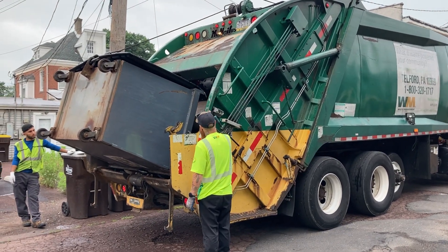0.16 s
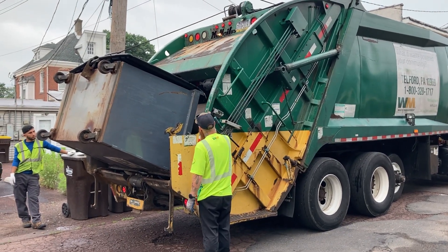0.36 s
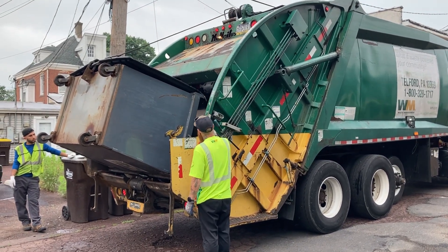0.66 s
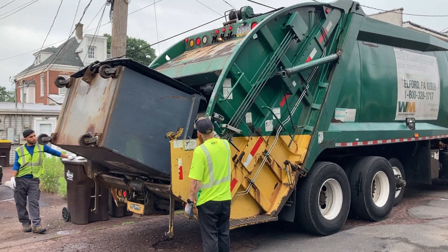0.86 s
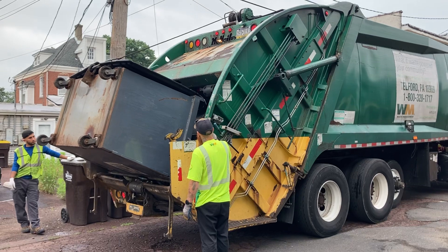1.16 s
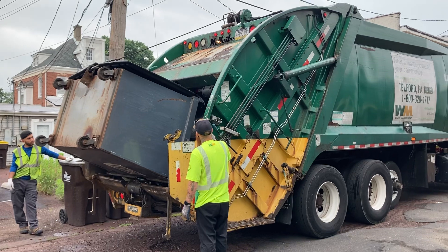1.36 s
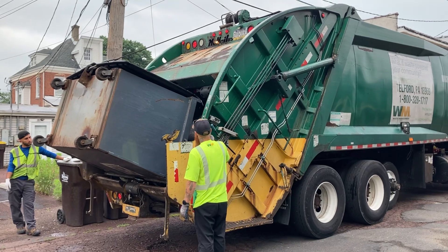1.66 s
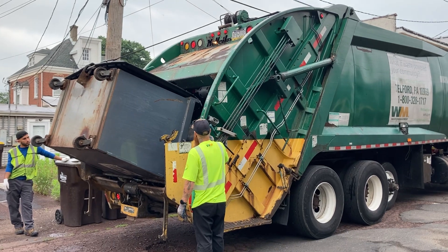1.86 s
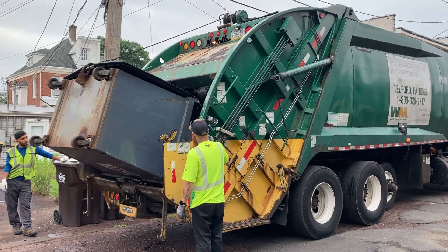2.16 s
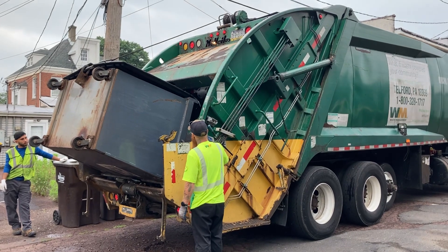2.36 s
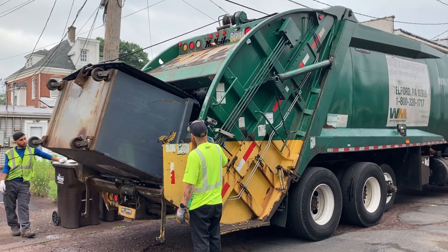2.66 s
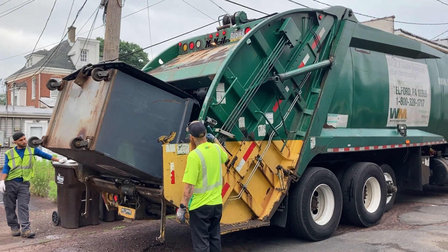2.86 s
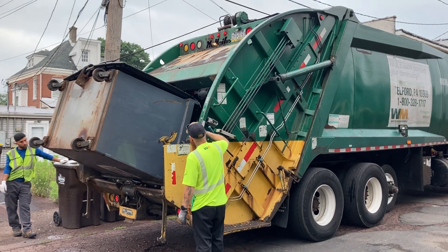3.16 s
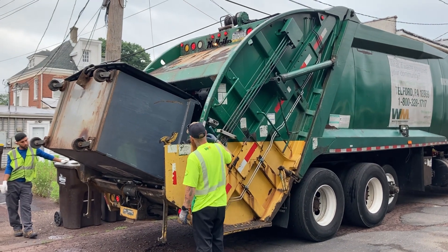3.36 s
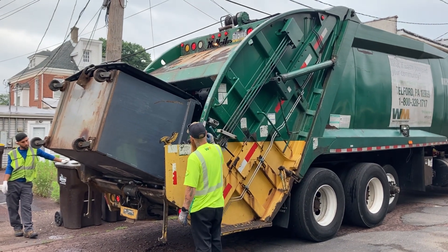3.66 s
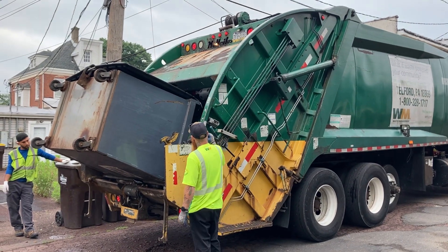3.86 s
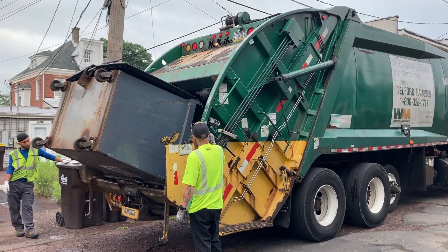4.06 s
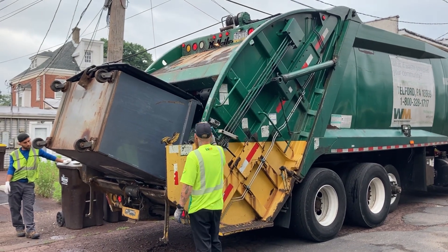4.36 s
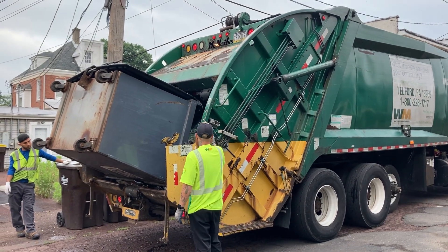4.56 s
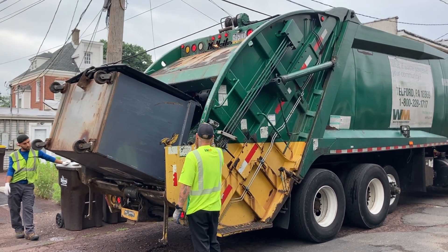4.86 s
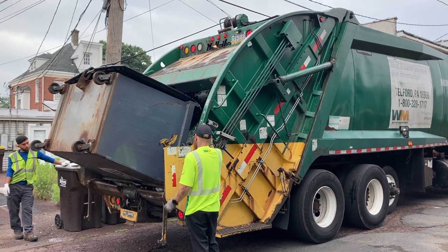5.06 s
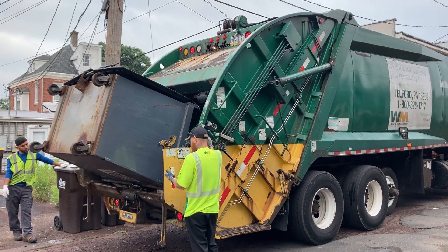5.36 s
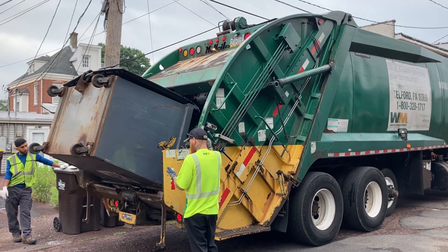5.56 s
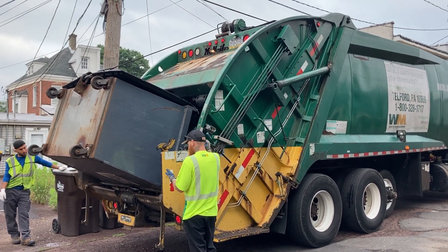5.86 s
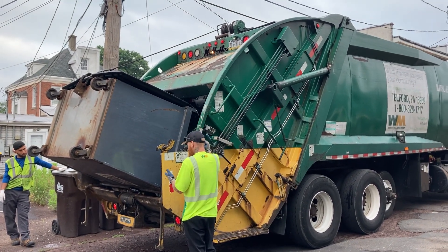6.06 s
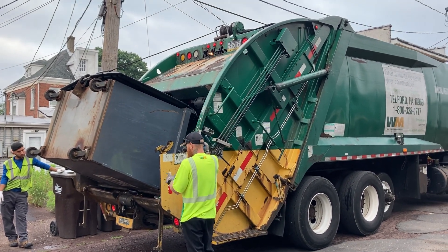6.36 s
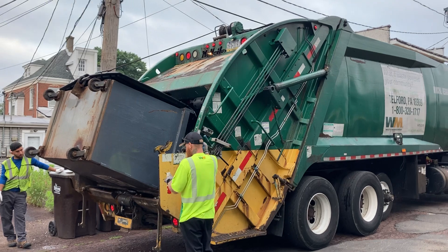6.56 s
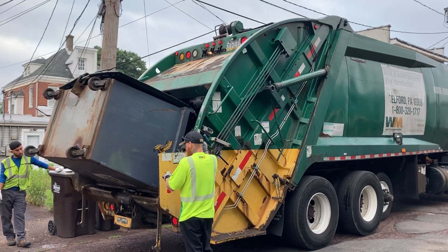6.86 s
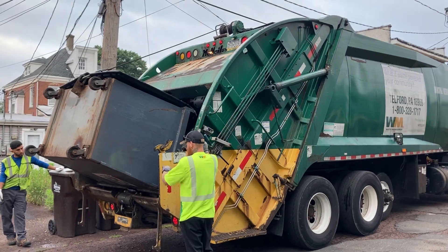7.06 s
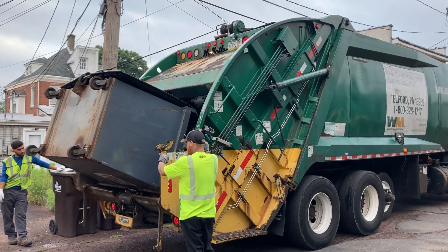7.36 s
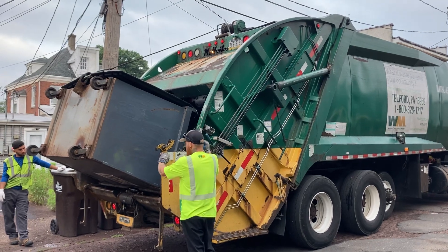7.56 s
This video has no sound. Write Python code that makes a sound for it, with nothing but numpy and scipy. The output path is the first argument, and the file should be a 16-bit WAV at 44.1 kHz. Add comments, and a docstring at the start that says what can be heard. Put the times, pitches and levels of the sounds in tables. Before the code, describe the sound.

From 0 s a heavy diesel refuse truck idles fast and close by, filling the stereo picture with a drone near 100 Hz, broad low roar, ringing body panels, valve clatter, light hiss and fine high jingling of loose steel. Hydraulic pump hum throbs nearly four times a second until about 1.8 s. At about 2 s the revs rise slightly, the drone surges unevenly and the rattle thickens; speed eases back from 2.7 to 4 s. The load knocks at 2.46 and 2.6 s, with faint taps near 3 s, a short airy puff at 3.08 s, and a dense hollow metallic tumble from 3.25 to 3.45 s. The steady idle continues, its drone slowly swelling and dipping, with weak taps at 3.75, 5, 5.15, 6.1 and 6.36 s. A tight cluster of bright dry cracks hits at 7.2 s, with a tiny one at 7.6 s. Short street reflections follow the impacts; the engine never stops.

```python
"""In a street, a diesel refuse truck idles fast while its hydraulic lift holds a steel bin tipped; the revs flare once.
Sine tones make the exhaust drone and pump hum; shaped noise makes the roar, body rattle, valve clatter and hiss.
Each firing taps loose steel parts into ringing modes. The load knocks and snaps in noise bursts with modes,
and a valve puffs shaped noise. Left and right differ in phase, likeness and level by frequency; an echo follows."""
import sys
import numpy as np
from scipy import signal
from scipy.fft import rfft, irfft, next_fast_len
from scipy.io import wavfile
from scipy.ndimage import uniform_filter1d, map_coordinates

SR = 44100
rng = np.random.default_rng(int(sys.argv[2]) if len(sys.argv) > 2 else 0)


def to_wav(s):
    """Save 16-bit WAV."""
    ch = np.atleast_2d(s).T  # columns
    pcm = np.round(np.clip(ch, -1, 1) * 32767)  # PCM
    wavfile.write(sys.argv[1], SR, pcm.astype(np.int16))


N = 339570
T = np.arange(N) / SR


def amp(db):
    """Gain of a level in dB."""
    return 10 ** (np.asarray(db) / 20)


def unit(x):
    """x at rms 1."""
    return x / np.sqrt(np.mean(x ** 2) + 1e-20)


def curves(rows, at):
    """Every column after the first, interpolated at the given values of the first."""
    first, *columns = np.transpose(rows)
    return [np.interp(at, first, column) for column in columns]


def wobble(rate):
    """A smooth random curve with rate knots a second."""
    coarse = T[::64]
    knots = rng.standard_normal(int(N * rate / SR) + 4)
    return np.interp(T, coarse, map_coordinates(knots, [coarse * rate]))


def phase(hz):
    """Angle in radians of a tone whose pitch follows hz."""
    return 2 * np.pi * np.cumsum(hz) / SR


def filtered(x, response):
    """x times a response of frequency."""
    padded = next_fast_len(x.shape[-1] + 8192)
    spectrum = rfft(x, padded) * response(np.fft.rfftfreq(padded, 1 / SR))
    return irfft(spectrum, padded)[..., :x.shape[-1]]


def noise(spectrum, size=N):
    """Noise of rms 1 with a (freq_hz, level_db) spectrum on a log axis; size may hold several rows."""
    freq_hz, level_db = np.transpose(spectrum)

    def shape(hz):
        return amp(np.interp(np.log(hz + 1), np.log(freq_hz), level_db, left=-120))
    return unit(filtered(rng.standard_normal(size), shape))


def add(out, start_s, sound):
    """Mixes a sound in at start_s seconds."""
    start = round(start_s * SR)
    out[start:start + len(sound)] += sound[:len(out) - start]


def scattered(x):
    """The street's echo: each 30 Hz band comes back after its own delay, about 3 to 19 ms."""
    knots = np.arange(800)
    phase_lag = np.cumsum(rng.uniform(0.498, 3.5, len(knots)))  # radians; its slope is the delay
    return filtered(x, lambda hz: np.exp(-1j * np.interp(hz, 30 * knots, phase_lag)))


PUFF_S, PUFF_DB, PUFF_LENGTH_S = 3.075, -46, 0.025  # middle; narrow swell's peak; middle to 6 dB down
PUFF_SKIRT_DB, PUFF_SKIRT_S = 2, .08  # longer leak: peak over the narrow swell; middle to 6 dB down


def air_valve():
    """Air hissing through a narrow outlet: band noise that swells and fades."""
    outlet = noise([(4800, -29), (5700, -5), (6250, 0), (6700, -7), (7400, -24), (16000, -60)])

    def bell(length_s):
        return 2 ** -((T - PUFF_S) / length_s) ** 2
    swell = bell(PUFF_LENGTH_S) + amp(PUFF_SKIRT_DB) * bell(PUFF_SKIRT_S)
    return amp(PUFF_DB) * swell * outlet


# dry cracks in the load: start_s [s], drive_db [dB], noise_t60_s [s]
SNAP_EVENTS = [(7.2012, -20, .035), (7.2061, -18, .01), (7.2071, -15, .01), (7.2105, -28, .12),
               (7.2175, -32, .06), (7.2245, -32, .12), (7.585, -35, .04)]
# colour of the crack noise: freq_hz [Hz], level_db [dB per Hz, relative]
SNAP_SPECTRUM = [(1500, -16), (2800, 0), (3700, -4), (4800, 0), (5600, -8), (8000, -8), (10000, -12),
                 (15000, -16)]
# short modes a snap rings: freq_hz [Hz], level_db [dB against the drive]
SNAP_MODES = [(2720, -3), (3100, -10), (3350, -6), (3840, -13), (4420, -8), (4620, -6), (5100, -7)]
SNAP_RISE_S, SNAP_CRACK_DB, SNAP_RING_S = .0003, -2, .018  # rise time; noise share; t60 of the modes


def snaps():
    """Dry bright cracks: decaying noise over a few short modes."""
    out, t = np.zeros(N), T[:SR // 5]
    for start_s, drive_db, noise_t60_s in SNAP_EVENTS:
        crack = amp(SNAP_CRACK_DB - 60 * t / noise_t60_s) * noise(SNAP_SPECTRUM, size=len(t))
        modes = sum(amp(level_db + rng.normal(0, 1.1)) * np.sin(2 * np.pi * freq_hz * t)
                    for freq_hz, level_db in SNAP_MODES)
        ring = amp(-60 * t / SNAP_RING_S) * modes
        rise = 1 - np.exp(-t / SNAP_RISE_S)
        add(out, start_s, amp(drive_db) * rise * (crack + ring))
    return out


# load knocking on the bin: start_s [s], drive_db [dB], burst_t60_s [s], tilt_db [dB per octave],
# ring_db [dB, gain of the bin's modes]
KNOCK_EVENTS = [(2.4565, -24, .04, 1, -20), (2.596, -30, .03, 3, -25), (2.954, -34, .03, 2, -25),
                (3.092, -35, .04, 1, -20), (3.135, -34, .04, 0, -15), (3.25, -27, .05, 2, -8),
                (3.259, -27, .05, 2, -4), (3.268, -25, .04, 1, 6), (3.2747, -24, .04, 0, 4),
                (3.281, -23, .04, -1, 11), (3.291, -25, .05, -2, 5), (3.3, -25, .05, -1, 5),
                (3.311, -27, .05, -1, 4), (3.326, -31, .06, 0, 1), (3.345, -30, .07, 0, 2),
                (3.362, -32, .08, 1, -5), (3.396, -33, .06, 0, -5), (3.455, -36, .04, -2, 2),
                (3.745, -34, .04, 1, -20), (4.96, -34, .04, 1, -20), (5.153, -33, .04, 0, -15),
                (6.105, -34, .05, 1, -15), (6.135, -32, .08, -1, -10), (6.36, -33, .04, -1, -15)]
# modes of the steel bin: freq_hz [Hz], level_db [dB, relative], t60_s [s]
BIN_MODES = [(42, -10, .3), (214, -3, .08), (310, -1, .07), (350, 1, .07), (420, -2, .08), (530, -3, .1),
             (645, -8, .08), (965, -9, .09), (1215, -13, .06), (1450, -14, .06), (2360, -18, .11),
             (2794, -13, .13), (3262, -17, .12), (3461, -18, .11), (4185, -17, .11), (4510, -17, .1),
             (8010, -15, .15)]
KNOCK_RISE_S = 0.0019
BIN_SCATTER_HZ = 11  # pitch scatter of a mode from blow to blow


def knocks():
    """Blows of the load: a burst of tilted noise and the bin's decaying modes."""
    out, t = np.zeros(N), T[:SR // 3]
    for start_s, drive_db, burst_t60_s, tilt_db, ring_db in KNOCK_EVENTS:
        # the tilt pivots at 2260 Hz; the top loses a further 10 dB by 16 kHz
        spectrum = [(200, -3.5 * tilt_db), (2260, 0), (16000, 2.8 * tilt_db - 10)]
        burst = noise(spectrum, size=len(t)) * amp(-60 * t / burst_t60_s)
        ring = np.zeros(len(t))
        for freq_hz, level_db, t60_s in BIN_MODES:
            decay = amp(level_db + rng.normal(0, 3) - 60 * t / t60_s)
            ring += decay * np.sin(2 * np.pi * rng.normal(freq_hz, BIN_SCATTER_HZ) * t)
        rise = 1 - np.exp(-t / KNOCK_RISE_S)
        add(out, start_s, amp(drive_db) * rise * (burst + amp(ring_db) * ring))
    return out


# fuzzy tone that drops while the revs flare: time_s [s], pitch_hz [Hz], level_db [dB]
WHINE = [(0, 1055, -42), (1.9, 1055, -44), (2.1, 985, -40), (2.7, 980, -44), (3.2, 1000, -44),
         (3.6, 1050, -46), (7.7, 1050, -48)]
WHINE_WIDTH_HZ = 45  # rate of the noise that blurs the tone


def whine():
    """Slow noise carried on a moving pitch."""
    pitch_hz, level_db = curves(WHINE, T)
    angle = phase(pitch_hz)
    fuzzy = wobble(WHINE_WIDTH_HZ) * np.cos(angle) + wobble(WHINE_WIDTH_HZ) * np.sin(angle)
    return amp(level_db) * unit(fuzzy)


# engine speed: time_s [s], firing_rate [firings per second]
SPEED = [(0, 32.52), (1.94, 32.6), (2.06, 34), (2.13, 34.5), (2.22, 34.1), (2.73, 33.6), (3.02, 33.3),
         (3.34, 32.9), (4.05, 32.5), (7.7, 32.52)]


def firings():
    """Firings counted since the start: the running sum of the engine speed."""
    return np.cumsum(curves(SPEED, T)[0]) / SR


# force on the loose parts: time_s [s], then drive_db [dB] of the first, second and third part
JINGLE_DRIVE = [(0, -36, -42, -42), (0.35, -32, -41, -39), (1.35, -35, -48, -40), (2.1, -32, -44, -36),
                (2.24, -54, -61, -52), (2.8, -41, -55, -53), (3.3, -37, -39, -47), (3.7, -41.5, -74, -43),
                (4.55, -36.5, -45.5, -40), (5.25, -36.5, -47, -43), (5.9, -44, -51, -48),
                (6.3, -43, -46, -45), (6.45, -38, -32.5, -45), (6.6, -49, -43, -46),
                (6.78, -30.5, -36.5, -43), (7.05, -40, -46, -40), (7.25, -39, -37, -43),
                (7.7, -44, -40.5, -46)]
# modes of the loose parts, one list for each: freq_hz [Hz], level_db [dB against the drive], t60_s [s]
JINGLE_PARTS = [
    [(7050, -2, .015), (7280, 4, .045), (7430, -6, .04), (8210, -3, .12), (10655, -8, .08),
     (11305, -10, .07)],
    [(10958, 2, .08), (12805, 1, .09), (15280, -10, .12)],
    [(8940, 1, .09), (13390, -2, .1)],
]


def jingle():
    """Each firing shakes the loose parts; every tap rings each mode at a new strength and phase."""
    taps = np.flatnonzero(np.diff(np.floor(firings() - .41)))
    taps = np.clip(taps + rng.normal(0, 0.00091 * SR, len(taps)), 0, N - 1).astype(int)
    force_db = 2 * rng.standard_normal(len(taps))
    out = np.zeros(N)
    for modes, drive_db in zip(JINGLE_PARTS, curves(JINGLE_DRIVE, taps / SR)):
        for freq_hz, level_db, t60_s in modes:
            slow_db = uniform_filter1d(rng.normal(0, 5.5, len(taps)), size=3)
            chance_db = slow_db + rng.normal(0, 3, len(taps))
            strength = amp(drive_db + level_db + force_db + chance_db)
            blows = np.zeros(N, np.complex64)
            blows[taps] = strength * np.exp(2j * np.pi * rng.random(len(taps)))
            turn = np.exp(2j * np.pi * freq_hz / SR)
            ring = turn * amp(-60 / (t60_s * SR))
            rise = turn * np.exp(-1 / (0.0034 * SR))
            # two decays subtracted: the ring swells, then dies
            out += signal.lfilter([ring - rise], np.poly([ring, rise]), blows).real
    return out


def shaft_tone(multiple, level_db):
    """A sine at a multiple of the firing rate, of rms level_db; its wandering phase makes it a little fuzzy."""
    drift = .5 * wobble(5) + rng.uniform(0, 2 * np.pi)
    return np.sqrt(2) * amp(level_db) * np.sin(2 * np.pi * multiple * firings() + drift)


# weaker tones: multiple [of the firing rate], before_db, during_db, after_db [dB, around the flare],
# waver_db [dB]
TONES = [(1, -46, -47, -55, 3), (1.501, -51, -50, -61, 3.7), (2, -34, -33.5, -30, 1.2),
         (3.82, -31.5, -37, -33, 2.1), (4, -37.5, -35.5, -35, 2.7), (5, -40, -40, -42, 3.4),
         (6, -28, -27, -34, 1.7), (6.3, -31, -40, -34.5, 2.5), (7, -48, -37, -32, 2.1),
         (8, -44, -33.5, -52, 2), (9, -45, -37, -41.5, 2.2)]
# the flare sets in, is full, starts to pass, is over [s]
FLARE_S = 1.95, 2.15, 3.2, 3.6


def weaker_tones():
    """Sines locked to the shaft that waver and change level with the flare of the revs."""
    out = np.zeros(N)
    for multiple, before_db, during_db, after_db, waver_db in TONES:
        level_db = np.interp(T, FLARE_S, [before_db, during_db, during_db, after_db])
        out += shaft_tone(multiple, level_db + waver_db * wobble(5))
    return out


PUMP_MULTIPLE, PUMP_DB, PUMP_WAVER_DB = 5.31, -25, 1.5  # of the firing rate; middle level; random swing
# the throb's rate, swing, one of its peaks, and its end just before the revs flare
THROB_HZ, THROB_DB, THROB_PEAK_S, THROB_ENDS_S = 3.68, 4, 1.073, 1.84


def pump_hum():
    """The pump turns with the shaft: one wavering tone that throbs until just before the flare."""
    throb_db = THROB_DB * np.cos(2 * np.pi * THROB_HZ * (T - THROB_PEAK_S)) * (T < THROB_ENDS_S)
    return shaft_tone(PUMP_MULTIPLE, PUMP_DB + throb_db + PUMP_WAVER_DB * wobble(12))


# exhaust drone swelling and dipping: time_s [s], level_db [dB rms]
DRONE_LEVEL = [(0.0, -18), (0.04, -16), (0.64, -25), (1.98, -22), (2.04, -16.5), (2.11, -17.5), (2.15, -21),
               (2.23, -12), (2.33, -17), (2.44, -33), (2.53, -15), (2.61, -16.5), (2.66, -21),
               (2.76, -21.5), (2.83, -37), (2.88, -18.5), (2.96, -17.5), (3.73, -19), (3.79, -25),
               (3.99, -19.5), (4.1, -27), (4.31, -20), (4.44, -31), (4.68, -19.5), (5.15, -36.5),
               (5.42, -20.5), (5.77, -32), (5.9, -21.5), (6.52, -23.5), (6.58, -37), (6.6, -27.5),
               (6.95, -21.5), (7.03, -37), (7.1, -24.5), (7.3, -23.5), (7.44, -16), (7.55, -24), (7.7, -22)]
# its pitch, near three times the firing rate: time_s [s], pitch_hz [Hz]
DRONE_PITCH = [(0, 97.56), (1.95, 97.5), (2.04, 99.6), (2.14, 104.4), (2.85, 104), (2.96, 101.8),
               (3.25, 99.6), (3.7, 98.1), (4.05, 97.5), (7.7, 97.56)]


def exhaust_drone():
    """One low sine on its own pitch curve, swelling and dipping."""
    level_db, pitch_hz = curves(DRONE_LEVEL, T)[0], curves(DRONE_PITCH, T)[0]
    return np.sqrt(2) * amp(level_db) * np.sin(phase(pitch_hz))


# body panels that ring with the engine noise: freq_hz [Hz], width_hz [Hz], gain_db [dB at the centre]
PANELS = [(231.4, 8.1, 1), (276.1, 11.7, 0.5), (303.8, 6.1, -2), (339.6, 9.1, -8), (424, 4.6, 0.5),
          (650, 24, -6), (1050, 19, -8.5), (1210, 6.7, -9), (1269, 5, -8), (1417, 12, -2), (1526, 23, -2),
          (1652, 18, 0), (2523, 80, -1.5), (2777, 87, -2.5), (4010, 420, -3.5)]
PANEL_WAVER_DB = 2


def panels(shaking):
    """The engine noise through resonances; neighbouring panels waver apart in two groups."""
    def resonance(hz, group):
        return sum(amp(gain_db) * 1j * hz * width_hz / (freq_hz ** 2 - hz ** 2 + 1j * hz * width_hz)
                   for freq_hz, width_hz, gain_db in group)
    return sum(amp(PANEL_WAVER_DB * wobble(2.49)) * filtered(shaking, lambda hz: resonance(hz, group))
               for group in (PANELS[0::2], PANELS[1::2]))


# engine effort: time_s [s], roar_db, body_db, clatter_db [dB: roar, body rattle, valve clatter]
LOAD = [(0, -25.5, -30.5, -38.5), (0.4, -24.5, -32.5, -40), (1.8, -24.5, -32, -39.5),
        (2.12, -23, -27.5, -39), (2.55, -21, -27, -38), (2.75, -22, -27.5, -38.5), (3.05, -21.5, -28, -38),
        (3.7, -22.5, -29, -39.5), (4.7, -23, -31, -40.5), (5.2, -23.5, -29.5, -40.5),
        (6.5, -23, -29.5, -40), (7.7, -24, -30.5, -41)]
# level of the hiss: time_s [s], level_db [dB]
HISS_LEVEL = [(0, -43.5), (2.1, -42.5), (2.3, -47), (3, -47), (4.3, -46.5), (5.3, -48), (6, -47.5),
              (7, -46.5), (7.7, -47.5)]
# colours of the four noises: freq_hz [Hz], level_db [dB per Hz, relative]
ROAR_SPECTRUM = [(20, -36), (32, -14), (60, -6.5), (82, -6), (125, 1.5), (160, 1.5), (215, -2), (300, -3.5),
                 (450, -12.5), (700, -59)]
BODY_SPECTRUM = [(250, -9), (450, 1), (750, -5), (1050, -5), (1600, -9.5), (2000, -14), (2800, -35.5)]
CLATTER_SPECTRUM = [(1500, -0.5), (2200, 3.5), (2600, 2.5), (3200, 2), (4200, -0.5), (5000, -3),
                    (6800, -5.5), (8000, -11), (9000, -50)]
HISS_SPECTRUM = [(6000, -30), (7500, -1), (10000, 0), (12500, -6), (13600, -9), (14100, -19), (14600, -15),
                 (15500, -13)]
ROAR_BEAT_DB, CHUG_DB = 1.5, .9  # roar swells once a firing; body rattle three times a firing


def engine():
    """Two unrelated draws of roar, rattle, clatter and hiss that swell with the firings, plus the panels."""
    roar_db, body_db, clatter_db = curves(LOAD, T)
    turns = firings()
    beat = np.cos(2 * np.pi * (turns - .5))
    chug = np.cos(6 * np.pi * turns)
    shared = wobble(13)  # clatter and hiss flicker together

    def pair(level_db, spectrum):
        return amp(level_db) * noise(spectrum, size=(2, N))
    roar = pair(roar_db + ROAR_BEAT_DB * beat + 0.083 * wobble(3.2), ROAR_SPECTRUM)
    body = pair(body_db + CHUG_DB * chug + .8 * wobble(15), BODY_SPECTRUM)
    clatter = pair(clatter_db + 0.28 * beat + 0.72 * shared + 1.06 * wobble(40), CLATTER_SPECTRUM)
    hiss = pair(curves(HISS_LEVEL, T)[0] + 2 * beat + .8 * shared + wobble(30), HISS_SPECTRUM)
    shaking = roar + body + clatter
    return shaking + panels(shaking) + hiss


SIDE = np.array([[1], [-1]])  # left, right
# stereo picture by frequency: freq_hz [Hz], left_behind [half turns, left phase behind right],
# likeness [0-1, of left and right], left_over_right_db [dB]
STEREO = [(20, 0, .9, .5), (100, .01, .97, 1.8), (350, .06, .94, 2), (700, .35, .72, .5),
          (1400, .18, .77, 1), (2200, .7, .45, 4), (3000, .76, .15, 2.5), (3700, .76, .4, 1.5),
          (4600, .95, .2, 0), (5600, 1.05, .4, -1.5), (6300, 1.6, .2, -1), (7000, 1.94, .65, 0),
          (7700, 2.2, .5, 0), (8400, 3, 1, 0), (9550, 3, 1, 0), (10300, 3.6, .6, 0), (11000, 4, 1, 0),
          (11700, 4, 1, 0), (12400, 4.4, .55, 0), (13150, 5, 1, 0), (14350, 5, 1, 0), (14700, 5.5, .45, 0),
          (15200, 6, 1, 0)]


def stereo(hz, share):
    """Left and right response: a phase and level difference, and a cosine or sine share set by likeness."""
    left_behind, likeness, left_db = curves(STEREO, hz)
    mix = share(SIDE * np.arccos(np.clip(likeness, 0, 1)) / 2)
    return mix * np.exp(-.5j * np.pi * SIDE * left_behind) * amp(SIDE * left_db / 2)


def from_direction(x, left_lag_s, lean):
    """An event on left and right, with its own lag and a (freq_hz, left_over_right_db) lean."""
    def response(hz):
        return np.exp(-1j * np.pi * SIDE * hz * left_lag_s) * amp(SIDE * curves(lean, hz)[0] / 2)
    return filtered(x, response)


# lean of the snaps to one side: freq_hz [Hz], left_over_right_db [dB]
SNAP_LEAN = [(2000, 2), (2800, 9), (4500, 7), (5100, -7), (6000, 0), (7500, 6), (9000, 0)]
KNOCK_LAG_S, SNAP_LAG_S, PUFF_LAG_S = -.00004, -.0002, .00016  # left later than right
ECHO_DB = -9  # walls' answer to knocks, snaps and puff


def scene():
    """Left and right share the truck's direct sound and get opposite shares of the spread noise and echo.
    Knocks, snaps and puff come from their own directions."""
    tones = exhaust_drone() + pump_hum() + weaker_tones() + whine() + jingle()
    direct, spread = engine()
    echo = amp(-10) * scattered(tones)
    out = filtered(tones + direct, lambda hz: stereo(hz, np.cos))
    out += filtered(echo + spread, lambda hz: stereo(hz, np.sin))
    knocking, snapping, puff = knocks(), snaps(), air_valve()
    level = [(0, 0)]  # equally strong on both sides
    out += from_direction(knocking, KNOCK_LAG_S, level)
    out += from_direction(snapping, SNAP_LAG_S, SNAP_LEAN)
    out += from_direction(puff, PUFF_LAG_S, level)
    events = knocking + snapping + puff
    return out + amp(ECHO_DB) * np.array([scattered(events), scattered(events)])


TOP_HZ = 15800


def record(dry):
    """Band limit: nothing is kept at or above TOP_HZ."""
    return filtered(dry, lambda hz: hz < TOP_HZ)


dry = scene()
out = record(dry)
to_wav(out)
```